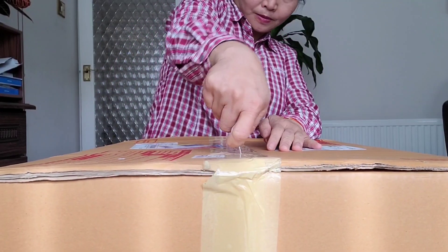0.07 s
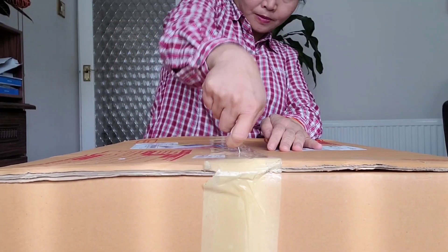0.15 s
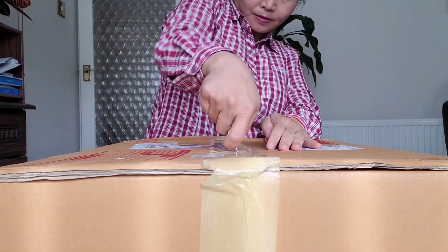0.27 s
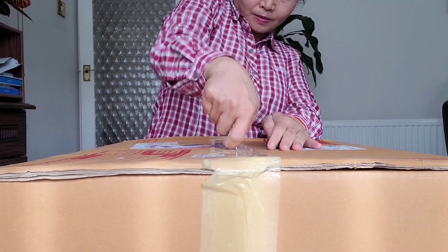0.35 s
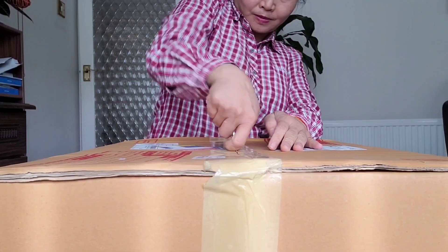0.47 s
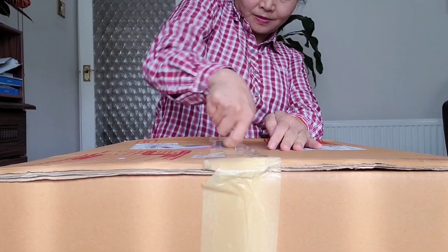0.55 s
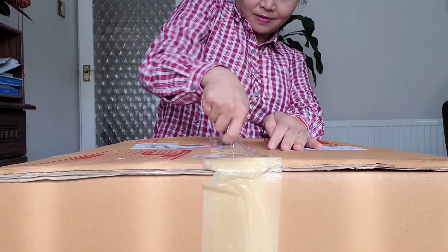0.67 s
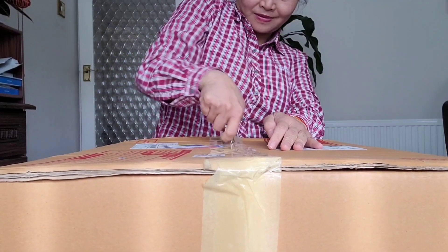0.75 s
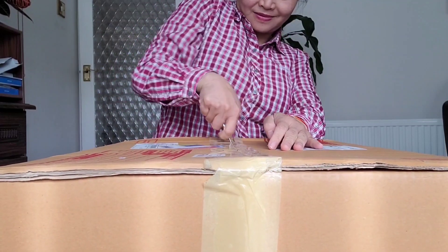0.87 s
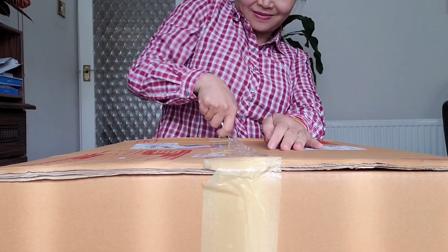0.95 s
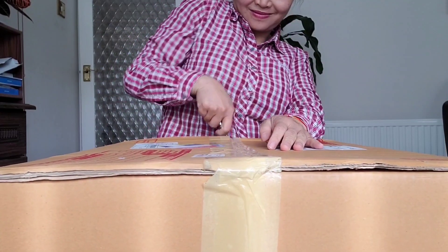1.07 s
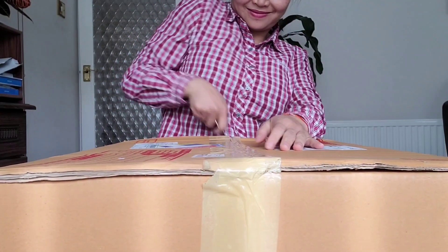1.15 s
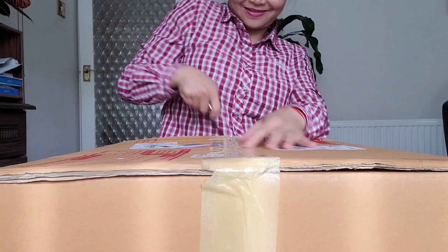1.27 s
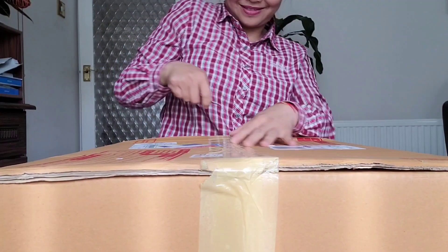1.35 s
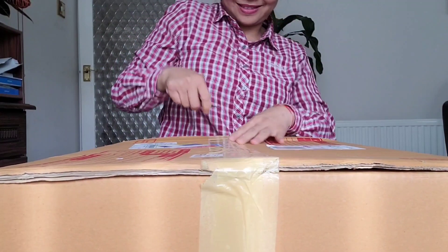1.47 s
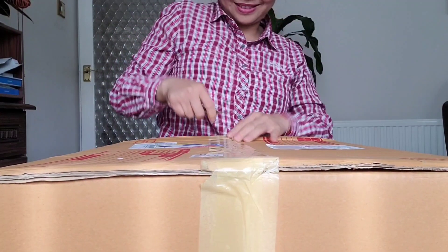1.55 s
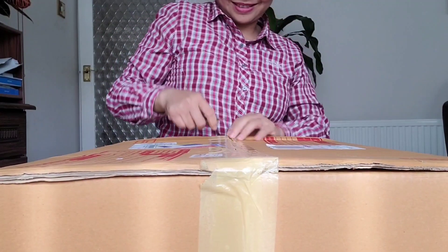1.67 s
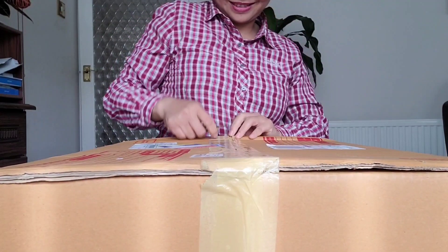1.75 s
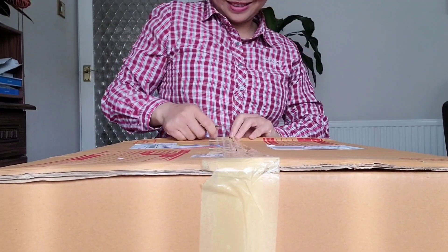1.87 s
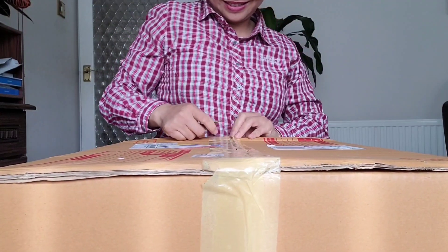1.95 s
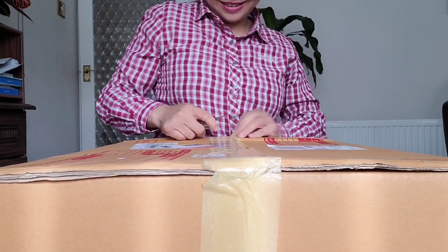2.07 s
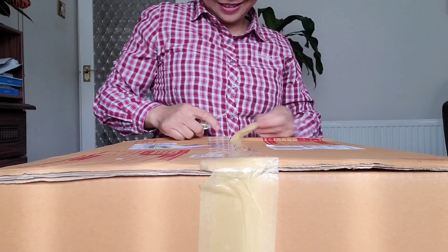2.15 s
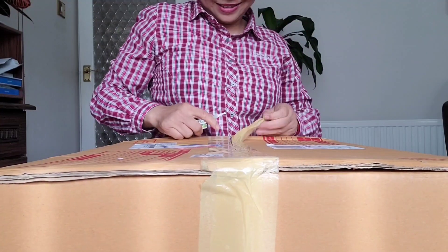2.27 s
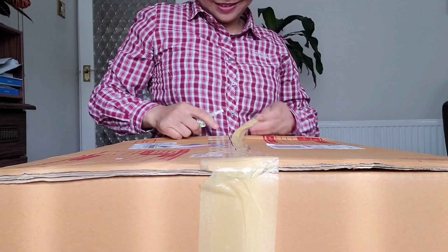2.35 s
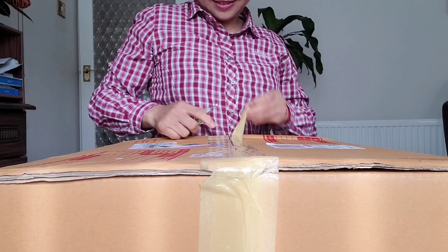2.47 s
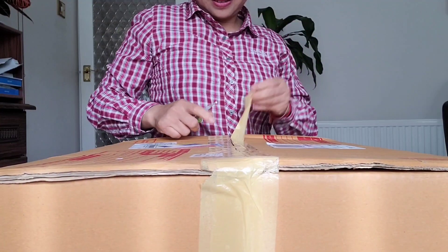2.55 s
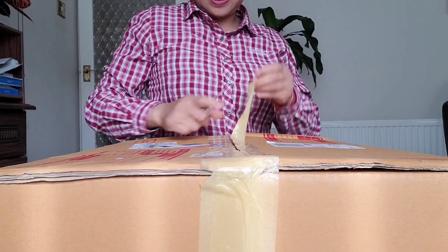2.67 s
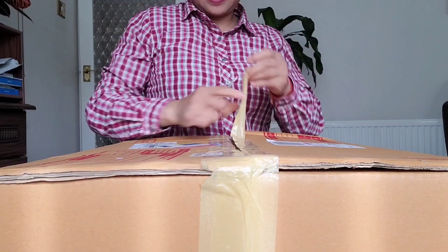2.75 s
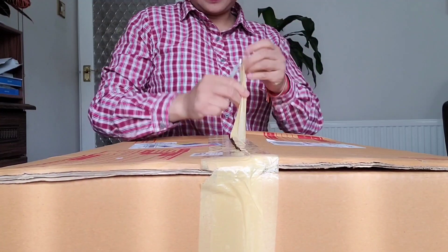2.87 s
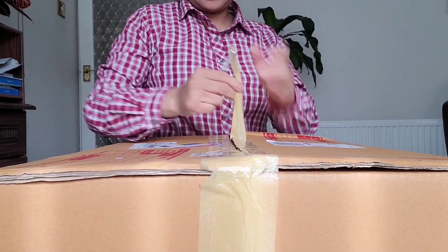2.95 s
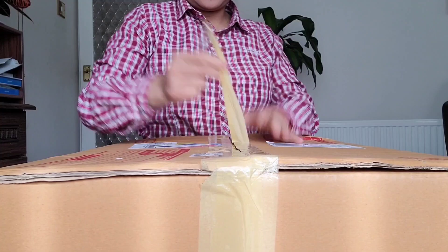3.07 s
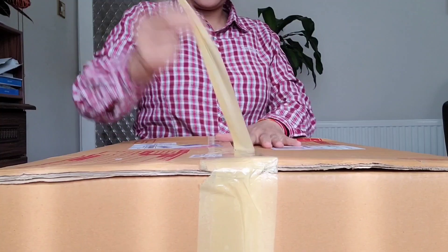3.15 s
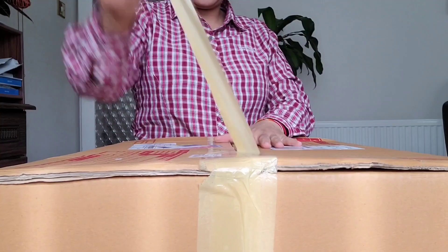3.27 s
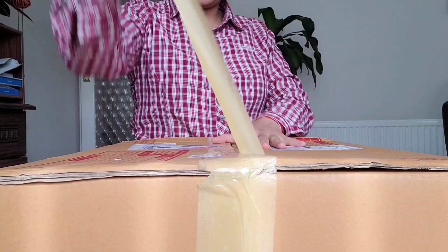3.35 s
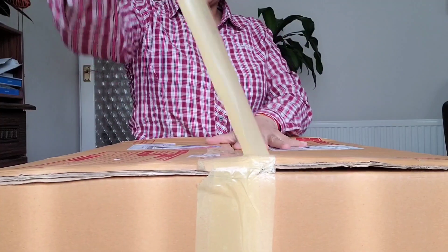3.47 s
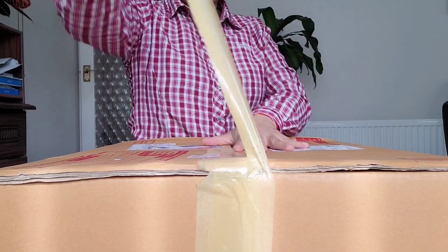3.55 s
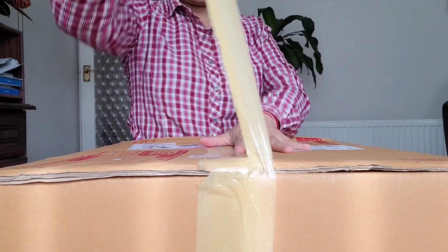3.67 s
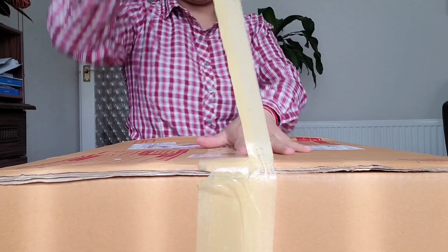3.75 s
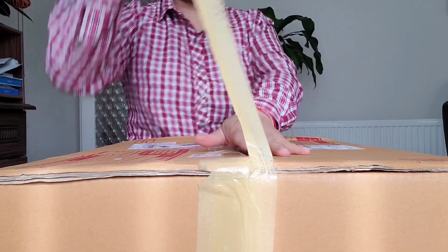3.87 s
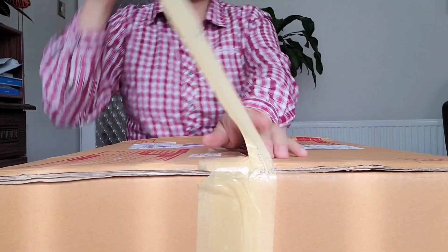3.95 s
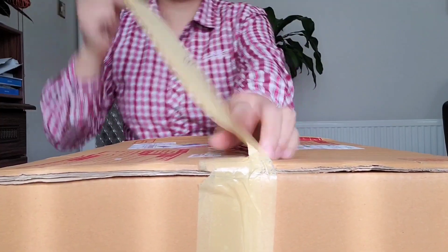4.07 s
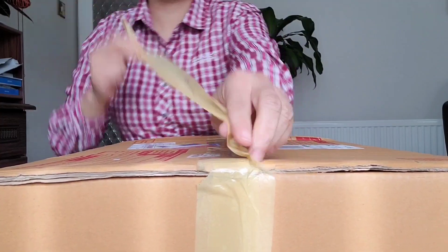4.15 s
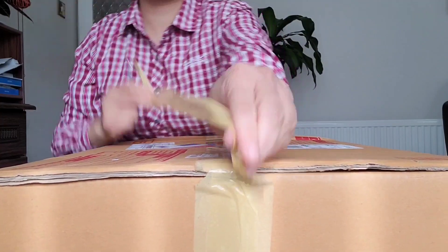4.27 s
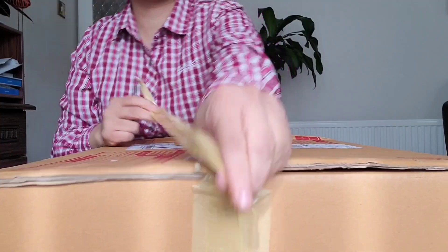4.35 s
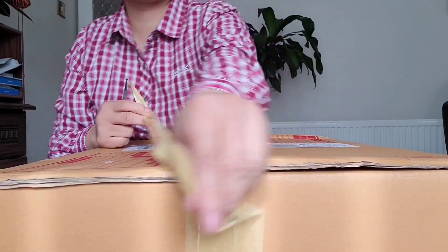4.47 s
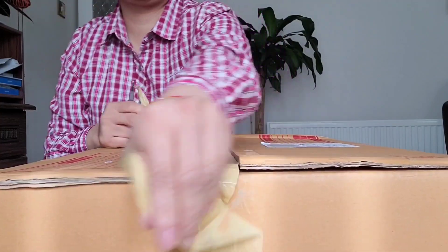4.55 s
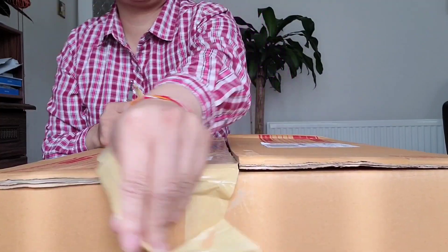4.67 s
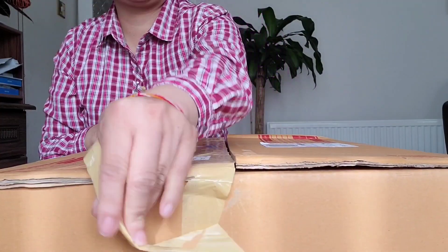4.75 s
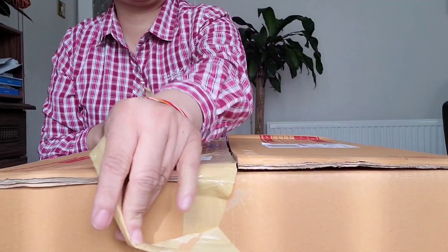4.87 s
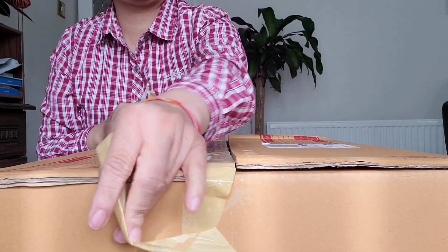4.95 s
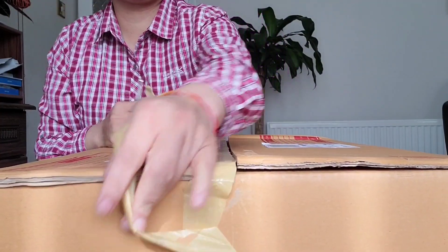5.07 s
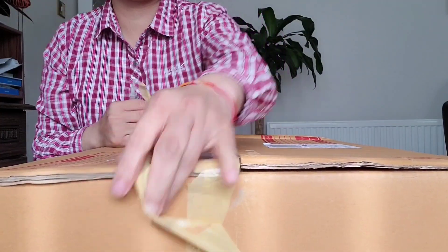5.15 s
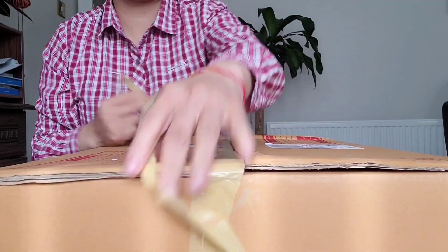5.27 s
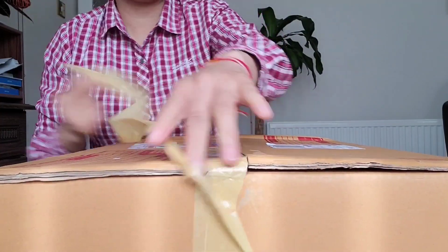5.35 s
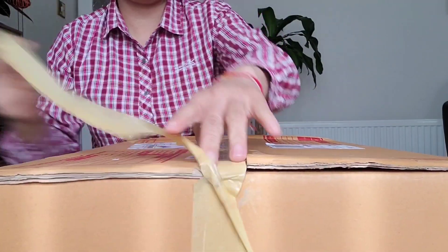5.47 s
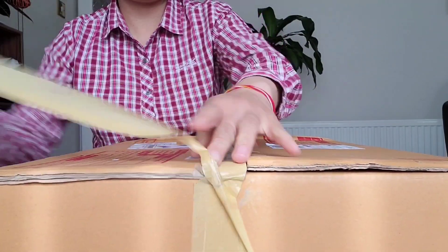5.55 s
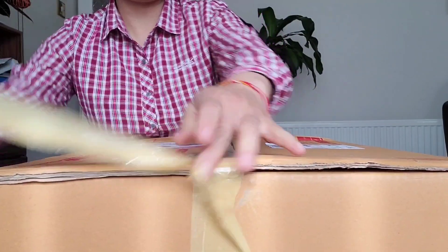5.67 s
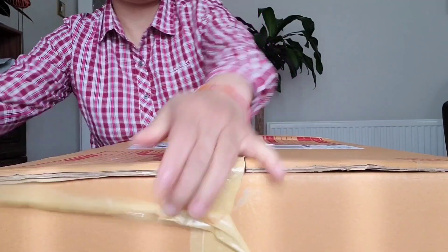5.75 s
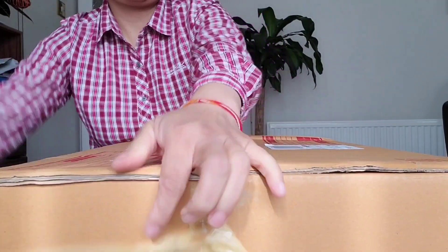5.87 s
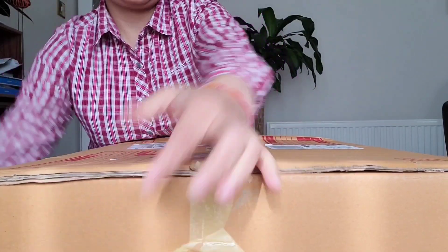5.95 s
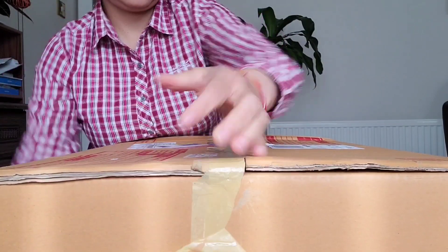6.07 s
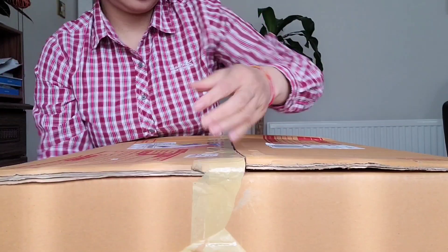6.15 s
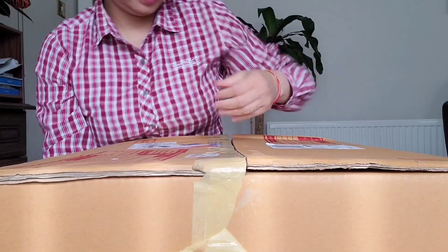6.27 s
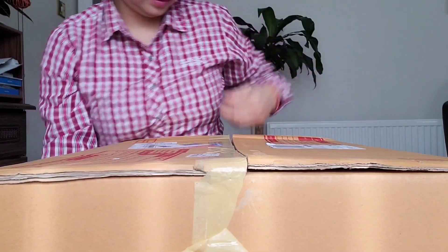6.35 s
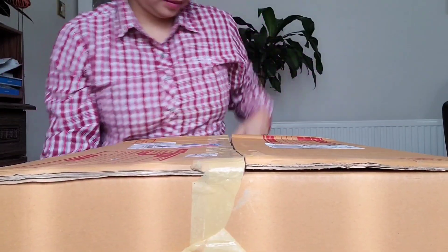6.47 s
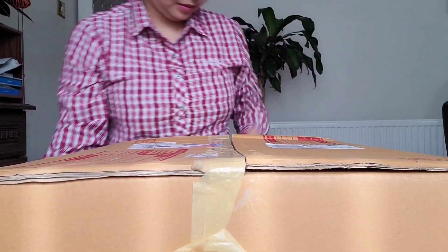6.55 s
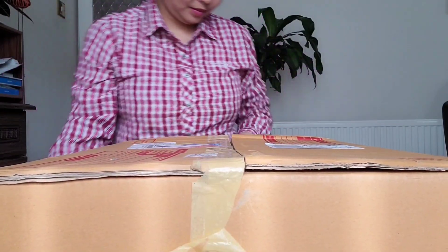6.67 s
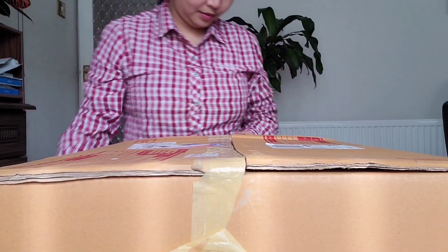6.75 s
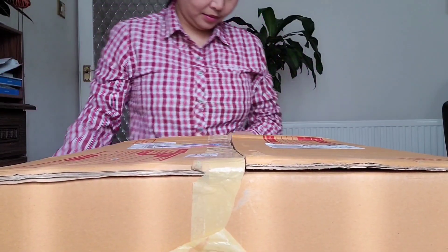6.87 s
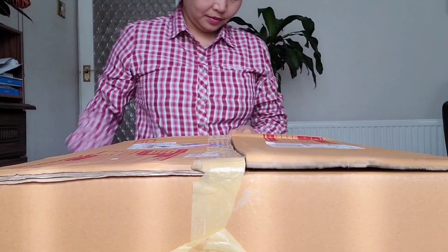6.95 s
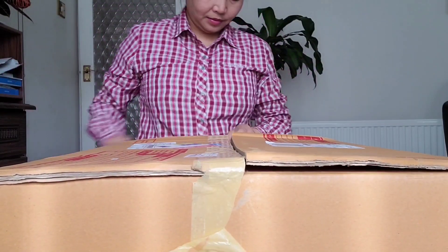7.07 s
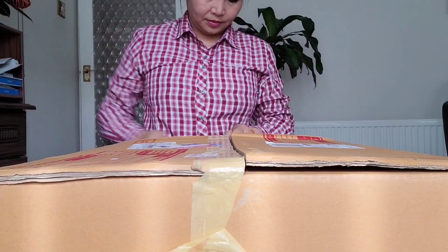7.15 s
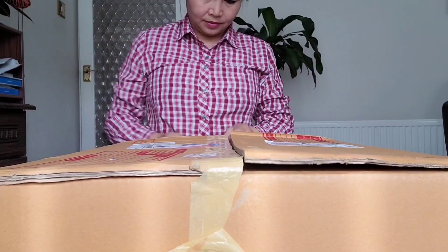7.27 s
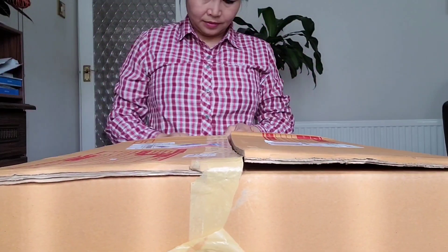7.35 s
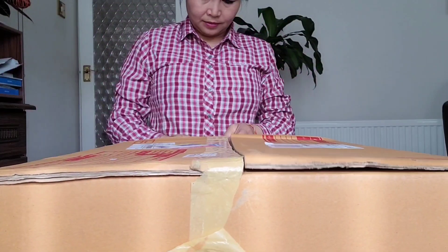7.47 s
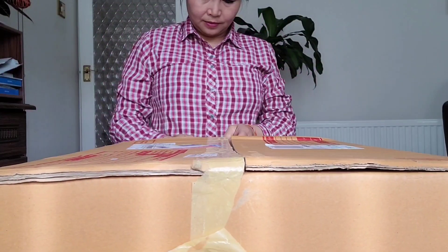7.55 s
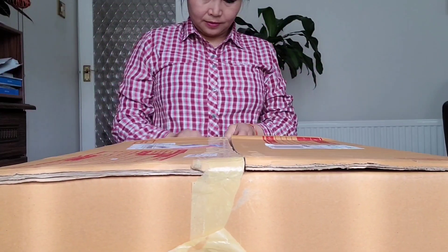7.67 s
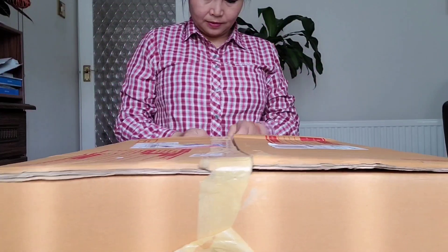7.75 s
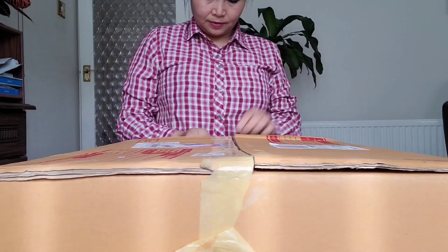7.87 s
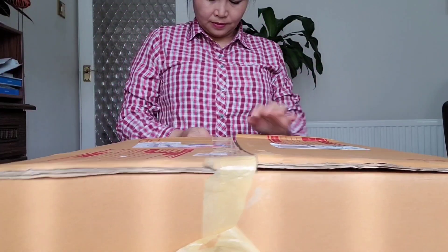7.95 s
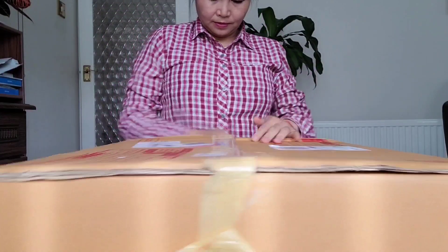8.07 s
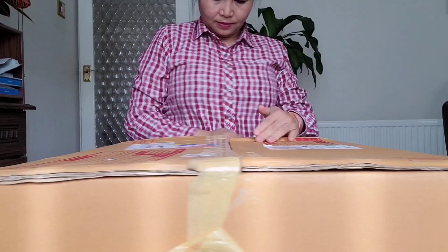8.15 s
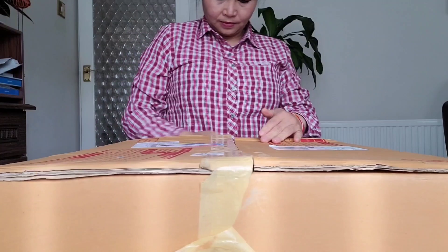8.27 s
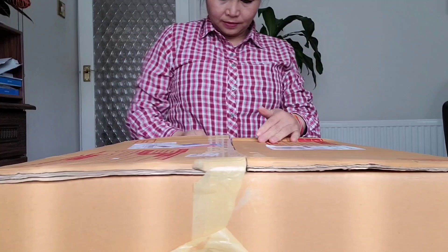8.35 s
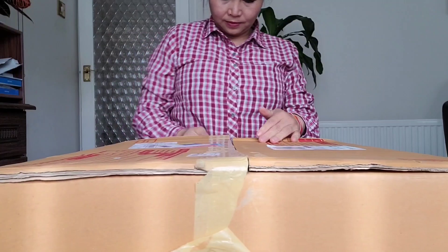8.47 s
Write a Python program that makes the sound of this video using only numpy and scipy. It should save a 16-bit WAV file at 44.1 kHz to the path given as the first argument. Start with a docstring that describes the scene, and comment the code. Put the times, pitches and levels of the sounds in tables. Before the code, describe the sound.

Blade scratches and hollow thumps on a large cardboard box, then packing tape is picked loose, ripped and peeled with bright crackles in a small room.

```python
"""Blade strokes scratch and thump on a large cardboard box; then its packing tape is picked, ripped and peeled.
Uneven stick-slip clicks make the bright glue crackle and the duller scrape of cardboard fibres.
Hand movement, knocks and shoves set low damped modes of the box drumming and booming.
Filtered clicks give single snaps, and a loose strip sings through a gliding resonance.
The working spot shifts between left and right, and sparse echoes give a small furnished room."""
import sys
import numpy as np
from scipy import signal
from scipy.io import wavfile
from scipy.ndimage import uniform_filter1d, map_coordinates

SR = 44100
rng = np.random.default_rng(int(sys.argv[2]) if len(sys.argv) > 2 else 0)


def waveform_to_disk(signal):
    """Save audio, clipped to [-1, 1], as 16-bit WAV at the path in sys.argv[1]."""
    frames = np.transpose(np.atleast_2d(signal))
    scaled = np.clip(frames, -1, 1) * 32767
    samples = np.round(scaled).astype(np.int16)
    wavfile.write(sys.argv[1], SR, samples)


N = 375291  # length [samples]

# Decay of the echoes: (frequency [Hz], time to fall by 60 dB [s])
ROOM_DECAY = [(100, 0.14), (300, 0.13), (1000, 0.12), (4000, 0.1), (13000, 0.096)]
# Likeness of the echoes at the two ears: (frequency [Hz], likeness [0-1])
EAR_LIKENESS = [(100, 0.5), (400, 0.45), (1200, 0), (4000, 0.03)]
# Where the hands work: (time [s], lead of the left ear [samples], left over right [dB])
HAND_PLACES = [(0, 10.5, 1), (1, 3, -1), (2.5, 4, 1), (3.7, 4.5, 0.5), (4.5, 5, 1), (5.3, -1, 0),
               (6.2, 2, -2), (7, 1, -2.5), (8.5, -2, -1.5)]

# Sway of the whole box: (frequency [Hz], bandwidth [Hz], relative level [dB])
SWAY_MODES = [(46.75, 4.5, 7), (65.8, 10.5, 7.5)]
# Boom of the lid: (frequency [Hz], bandwidth [Hz], relative level [dB])
LID_MODES = [(129, 10, -0.088), (139.3, 10.3, -0.91)]
# Drumming of the panels: (frequency [Hz], bandwidth [Hz], relative level [dB])
PANEL_MODES = [(239.5, 12, 4.5), (264.9, 9.5, 2), (321, 38, 5.5), (401, 79, 2.5), (484.6, 40, 0),
               (554.5, 82, 3.5), (673, 74, 0.5), (768, 71, -3), (943, 170, -4.5), (1164, 120, -7.5)]

# Hands shove the box: (time [s], sway of the whole box [dB], boom of the lid [dB])
SHOVES = [(0.0, -37.5, -42), (.07, -46, -58), (0.199, -51, -35), (0.249, -34, -33), (0.289, -39, -33),
          (0.401, -42, -25), (0.44, -34, -30.5), (0.506, -23, -28), (0.711, -34, -29.5), (0.801, -39, -33),
          (1.199, -36.5, -54), (1.92, -55, -73), (2.159, -45.5, -66), (2.641, -54, -51.5),
          (2.709, -61, -46), (3.04, -50, -36), (3.079, -55.5, -33), (3.202, -43, -22.5), (3.301, -41, -45),
          (3.341, -38.5, -26.5), (3.373, -31, -20.5), (3.62, -32, -45.5), (4.442, -41, -50),
          (4.582, -69, -49), (4.644, -69, -45), (4.724, -70, -46.5), (5.19, -46, -52.5),
          (5.362, -42.5, -59), (6.2, -60, -56), (6.667, -47, -43.5), (6.687, -41.5, -50),
          (7.045, -51.5, -59), (7.56, -56.5, -80.5), (8.07, -54, -53), (8.113, -31, -32.5),
          (8.17, -25.5, -44), (8.21, -38, -53), (8.271, -41, -55), (8.366, -54, -71)]
# Blows on the cardboard: (time [s], peak [dB], lid boom weight [dB], pitch of the struck panel [Hz])
KNOCKS = [(0.197, -26, -8, 354), (0.247, -21, -13, 400), (0.355, -21, 5, 330), (0.4, -15, -10, 264),
          (0.501, -10, -1, 317), (0.72, -20, 0, 400), (2.159, -30, -13, 480), (2.946, -31, 6, 269),
          (3.2, -18, -10, 494), (3.292, -23, -14, 238), (3.358, -21, -9, 250), (3.604, -16.5, -12, 307),
          (3.617, -22, -20, 337), (3.637, -28, -20, 340), (3.66, -22.5, -22, 314), (4.744, -31.5, -25, 320),
          (4.96, -34.5, -3.5, 257), (5.182, -23.5, -28, 258), (5.332, -24, -6.5, 330),
          (6.667, -34.5, -10, 230), (6.679, -39, -13, 260), (6.7, -39, -20, 270), (6.733, -43, -18, 280),
          (7.919, -41, -5.5, 270), (8.111, -17.5, -20, 555), (8.119, -18, -19, 230),
          (8.154, -19.5, -19, 520), (8.164, -19.5, -22, 247), (8.207, -29, -20, 250)]

# Loose tape and hands rustle underneath the strokes:
# (time [s], crackle [dB], scrape over crackle [dB], panels over crackle [dB])
RUSTLE = [(0.0, -60.5, 6, 5.5), (.66, -57.5, -5.5, 6.5), (1.33, -62, -9, -8), (1.66, -65, -2, -11.5),
          (2.12, -63, -7.5, -3.5), (2.4, -60, -8, -4), (2.47, -92, -11, -8), (2.6, -56.5, -4, -5.5),
          (2.8, -77, -12, 8.5), (2.93, -57.5, -2.5, 3), (4.15, -58.5, -10.5, -5.5), (4.9, -59.5, -14, -5.5),
          (5.05, -64, -5, -24), (5.3, -56, -8, -1.5), (5.84, -64.5, -6.5, -10), (5.89, -46, -6.5, -16),
          (6.24, -64, -27, -6), (6.5, -67, 3.5, -2), (6.95, -68.5, -5.5, -5.5), (7.08, -71.5, -11, 3.5),
          (7.2, -80, 8, 7), (7.47, -75, 6.5, -15), (7.74, -85, -6, -4), (8.04, -78.5, 2, 3),
          (8.51, -100, -8.5, -7)]
# Hand rubs, each a stroke: (start [s], length [s], crackle at full rise, without the swell [dB],
# swell over the stroke [dB], scrape over crackle [dB], panels over crackle [dB])
RUBS = [(1.44, 0.13, -47.5, -15, -3.5, -4), (1.9, 0.024, -69, -15, 2, -2),
        (2.04, 0.025, -54.5, -11, -13, 6), (6.66, 0.041, -74, -9, -6, 25.5), (6.76, 0.023, -55, -5, 0, 17),
        (7.54, 0.02, -44, -5, -1.5, -19), (7.77, 0.075, -53.5, -6.5, 4, 2.5),
        (7.88, 0.051, -64.5, -2, 9.5, 9), (8.07, 0.036, -43, -4, -12, -4.5)]
# Blade cuts, each a stroke: (start [s], length [s], crackle at full rise, without the swell [dB],
# swell over the stroke [dB], scrape over crackle [dB], panels over crackle [dB])
CUTS = [(0.0, 0.028, -36, -10, 3, 16.5), (.18, 0.2, -53, -18, 15, 16), (.33, 0.13, -45, -7, 4.5, 17),
        (.49, 0.031, -34.5, -7, 6.5, 8), (.68, 0.35, -49, -1.5, 4.5, 15), (.96, 0.22, -46.5, -1.5, 4, 12.5)]
# Tape peels, each a stroke: (start [s], length [s], crackle at full rise, without the swell [dB],
# swell over the stroke [dB], scrape over crackle [dB], panels over crackle [dB])
PEELS = [(2.158, 0.078, -41, -3.5, -1, -5.5), (2.363, 0.0067, -50.5, -10, -17, -21),
         (2.517, 0.043, -47.5, -3, -8.5, -17), (2.7, 0.015, -46, -6, -4.5, -3),
         (2.83, 0.14, -52, -10, -9.5, -6), (4.17, 0.39, -54.5, 0, -4.5, -1), (4.5, 0.23, -45, -2.5, -3, -2),
         (4.74, 0.094, -47.5, -4.5, -8, -6.5), (5.185, 0.024, -48, -0.5, -6, -22),
         (5.33, 0.011, -44, 0.5, -4.5, -6), (5.66, 0.039, -54, -0.5, -4, -18),
         (5.893, 0.34, -44.5, -13, -11, -23), (6.29, 0.066, -53, 7.5, -10, -7.5),
         (8.111, 0.053, -44, 3, 2.5, 4)]
# The long rip along the lid: (time [s], crackle [dB], scrape over crackle [dB],
# panels over crackle [dB], lid over panels [dB])
RIP = [(2.9, -83.5, 7.5, -7, -16), (2.97, -49, 11, 5.5, -6), (3.04, -55, -9, 8.5, 9),
       (3.13, -42, -1, 2.5, 9.5), (3.24, -34.5, -6, -4.5, 8.5), (3.42, -38, -4, 2.5, 3),
       (3.55, -38.5, -7.5, 1.5, 3.5), (3.645, -34, -6, -5, -10), (3.69, -53, 2, -7.5, -6),
       (3.79, -55, -13, -7, 2), (3.88, -51, -4.5, 3, -19), (4.1, -59, -5, -10, -17),
       (4.2, -92, -9.5, -3.5, -16)]

# Jerks of blade, tape or hand along the cardboard: (time [s], level before shaping [dB],
# dull part over bright part [dB], length [ms])
JERKS = [(0.1837, -38, 4, 18), (0.242, -44, 5, 50), (0.3522, -36, 7, 11), (0.401, -28.5, 1, 7.3),
         (0.4983, -30.5, 2.5, 14.2), (0.726, -40, 4, 48), (0.987, -36, 2, 32), (1.168, -37, 2, 11.4),
         (2.962, -37.5, 2.5, 12), (3.596, -23.5, -8, 13), (4.359, -24, -14, 6), (4.515, -36.5, -6.5, 24),
         (4.626, -35, -19.5, 24), (6.35, -37.5, -7.5, 31), (6.657, -52.5, 10, 17), (6.763, -50, 9, 57),
         (7.913, -48, 5.5, 36)]
# Glue letting go at once: (time [s], level of the first 2 ms before panning [dB],
# dull part over bright part [dB], left over right [dB])
SNAPS = [(1.937, -39.5, -11, 3), (2.1585, -31, -3.5, 3), (2.3303, -43, -7, -10), (2.363, -33.5, -8.5, 5),
         (2.4788, -46, -11, 1), (2.518, -33.5, -38, 8), (2.5382, -38, -9, -15), (2.7138, -38, -6, 13.5),
         (2.8315, -32.5, -11, 11), (2.9189, -48.5, -6.5, 28), (3.1573, -37, -4, 25), (3.2957, -44, -8, 4),
         (3.6403, -29, -6.5, 22.5), (4.1768, -39, -11, 0), (4.208, -39, -11.5, 5), (4.248, -34, -9, -3),
         (4.256, -27.5, -29, 8.5), (4.273, -30, -27, 0), (4.314, -38, -14, 11), (4.3376, -35.5, -13, 8),
         (4.357, -31, -20, -14), (4.414, -39, -27, 0), (4.441, -43, -20, 2), (4.62, -29, -42, 5),
         (4.677, -30.5, -16, 7), (4.7096, -33.5, -6, 5), (4.7451, -29, -3, 3.5), (4.9641, -27.5, -5.5, 1),
         (5.1827, -22.5, -6.5, -4), (5.3324, -28, -7, -13), (5.5337, -43.5, -23, 15),
         (5.6396, -39.5, -12.5, -6), (5.689, -41.5, -25, 16), (5.699, -42.5, -7, 8), (5.7934, -44, -9, 8),
         (5.9, -31.5, -15, -19), (6.0311, -36.5, -13, -13), (6.3068, -48.5, -23, -28), (7.6256, -51, -8, 0),
         (7.819, -47, 0, 4), (8.076, -41, -16, 2), (8.114, -26, -4, 5), (8.1494, -22, -5.5, 5.5)]
# A free strip of tape or flap sings at a pitch set by its length: (time [s], pitch [Hz], level [dB])
STRIP = [(3.38, 2610, -84), (3.45, 2290, -43), (3.58, 1690, -43.5), (3.66, 1626, -101), (6.06, 837, -100),
         (6.12, 950, -57), (6.17, 1100, -55.5), (6.25, 1306, -110)]
# Spectrum of torn cardboard fibres: (frequency [Hz], relative level per Hz [dB])
SCRAPE_COLOUR = [(450, -5.5), (900, -4), (1400, -2.5), (2400, -2.5), (3600, -5), (7000, -7), (15000, -73)]
# Spectrum of parting glue: (frequency [Hz], relative level per Hz [dB])
CRACKLE_COLOUR = [(1470, -18.5), (2500, -6.5), (2970, -8.5), (3130, -7.5), (4210, -5), (12100, -6.5),
                  (15200, -9), (16000, -19)]

# Manner of a stroke: (rise [s], fall [dB/s], lid over panels [dB], sway over panels [dB])
BLADE = (0.22, 238, -3.5, -12.5)
GLUE = (0.0251, 198, -4, -7.5)
PALM = (0.06, 227.5, -11.5, -12)

HUSH_DB = -99
EDGE_HZ = 16000  # upper band limit
CONTACT_CYCLES = 0.19  # a blow lasts this share of the panel's period
SHOVE_S, SWING_S = 0.0052, 0.032  # length of the push; the first swings, whose level the table gives
SHUDDER_DB, SHUDDER_FALL_DB_PER_S = -25, 175  # panels rattle on: level over the blow, and its fall
SCATTER_DB = 27.5  # threads part all over the tape, many of them far to the left or right


def gain_of(db):
    """Amplitude gain of a level in decibels."""
    return 10 ** (np.asarray(db) / 20)


def evened(x):
    """Scales a signal to rms 1."""
    return x / np.sqrt(np.mean(x ** 2) + 1e-20)


def read(points, hz):
    """Reads a frequency curve, joined by straight lines on a log frequency axis."""
    f, value = np.transpose(points)
    return np.interp(np.log(hz + 1), np.log(f + 1), value)


def column(table, index):
    """One control of a table, joined by straight lines over time."""
    rows = np.array(table)
    return np.interp(np.arange(N) / SR, rows[:, 0], rows[:, index])


def through(x, taps):
    """Passes a signal through an impulse response."""
    return signal.oaconvolve(x, taps)[:N]


def colour(points):
    """Causal (minimum-phase) impulse response of a spectrum, energy 1."""
    hz = abs(np.fft.fftfreq(4096, 1 / SR))
    log_gain = np.log(gain_of(np.maximum(read(points, hz), -100)))
    phase = -signal.hilbert(log_gain).imag
    taps = np.fft.ifft(np.exp(log_gain + 1j * phase)).real[:1024]
    return taps / np.linalg.norm(taps)


def tilted(dull_db):
    """Colour of one event: the more of the cardboard's middle range it has, the more its top droops."""
    middle = [(350, dull_db - 4.5), (900, dull_db + 5.5), (2200, dull_db + 4.5)]
    top = [(4200, 0.0064), (15500, -7.0 - 0.48 * dull_db)]
    return colour(middle + top)


def ring(modes):
    """Impulse response of damped modes, energy 1; a wider mode dies sooner."""
    t = np.arange(SR // 4) / SR
    taps = sum(gain_of(db) * np.sqrt(width) * np.exp(-np.pi * width * t) * np.sin(2 * np.pi * hz * t)
               for hz, width, db in modes)
    return taps / np.linalg.norm(taps)


def slips(per_s, spread_db, clump_db, clump_s):
    """Stick-slip force: clicks of very uneven size that come in clumps, rms 1."""
    size = gain_of(spread_db * np.minimum(rng.exponential(1, N), 4)) * rng.choice([-1., 1.], N)
    happens = rng.random(N) < per_s / SR
    clumps = evened(uniform_filter1d(rng.standard_normal(N), max(round(clump_s * SR), 2)))
    return evened(size * happens * gain_of(clump_db * np.clip(clumps, -2, 2)))


def wander(spread_db, pace_s):
    """The working spot moves about, so a mode is fed now more, now less; rms 1."""
    step = 100  # samples between drift points
    drift = rng.standard_normal(N // step + 2)
    drift = evened(uniform_filter1d(drift, max(round(pace_s * SR / step), 2)))
    smooth = np.interp(np.arange(N) / step, np.arange(len(drift)), drift)
    return evened(gain_of(spread_db * smooth))


def hush():
    """Very faint white noise, independent at each ear."""
    return gain_of(HUSH_DB) * rng.standard_normal((2, N))


def echoes(start_s):
    """Sparse taps of random sign, each band dying at its own speed; long waves reach both ears more alike."""
    size = SR // 2
    taps = np.zeros((2, size))
    at = np.arange(round(start_s * SR), size - 20, 20)
    at = at + rng.integers(0, 20, (2, len(at)))
    np.put_along_axis(taps, at, rng.choice([-1., 1.], at.shape), 1)
    hz, t, (a, b) = signal.stft(taps, SR, nperseg=512)
    alike = np.clip(read(EAR_LIKENESS, hz), 0, 1)[:, None]
    bands = np.array([a, alike * a + np.sqrt(1 - alike ** 2) * b])
    decay = gain_of(-60 * t / read(ROOM_DECAY, hz)[:, None])
    tail = signal.istft(bands * decay, SR, nperseg=512)[1]
    return tail / np.linalg.norm(tail[0])


def room(x, turns_per_s):
    """The sound fades steadily around three sets of echoes, so the room tail stays diffuse and noisy."""
    turn = 2 * np.pi * turns_per_s * np.arange(N) / SR
    out = np.zeros((2, N))
    for k in range(3):
        share = np.sqrt(2 / 3) * np.cos(turn + 2 * np.pi * k / 3)
        out += signal.fftconvolve((x * share)[None], echoes(0.0023), axes=1)[:, :N]
    return out


def ears(x):
    """A moving source reaches the ears with a shifting time lead and level difference."""
    n = np.arange(N)
    half_lead = column(HAND_PLACES, index=1) / 2
    half_pan_db = column(HAND_PLACES, index=2) / 2
    return np.array([gain_of(side * half_pan_db) * map_coordinates(ear, [n + side * half_lead], order=3)
                     for side, ear in zip((1, -1), x)])


def shoves():
    """One soft push sets the whole box swaying and the lid booming; both ring out freely."""
    out = np.zeros(N + SR)
    push = signal.windows.hann(round(SHOVE_S * SR))
    first_swings = round(SWING_S * SR)
    sway = np.convolve(push, ring(SWAY_MODES))
    sway /= np.sqrt(np.mean(sway[:first_swings] ** 2))
    boom = np.convolve(push, ring(LID_MODES))
    boom /= np.sqrt(np.mean(boom[:first_swings] ** 2))
    for s, sway_db, lid_db in SHOVES:
        out[round(s * SR):][:len(sway)] += gain_of(sway_db) * sway + gain_of(lid_db) * boom
    return out[:N]


def knocks():
    """A blow rings mostly the modes near the pitch of the panel that it strikes, and the lid."""
    lid = ring(LID_MODES) + 0.36 * ring(SWAY_MODES)
    out = np.zeros(N + SR)
    for s, db, boom_db, panel_hz in KNOCKS:
        # modes lose 21 dB per octave away from the struck pitch
        panel = ring([(hz, width, level - 21 * abs(np.log2(hz / panel_hz)))
                      for hz, width, level in PANEL_MODES])
        contact = signal.windows.hann(round(CONTACT_CYCLES * SR / panel_hz))
        blow = np.convolve(contact, panel + gain_of(boom_db) * lid)
        at = round(s * SR)
        out[at:at + len(blow)] += gain_of(db) * blow / abs(blow).max()
    return out[:N]


def drumming(panels, lid, rock):
    """Hands, blade and tape shake the box; each group of modes rings on after the force stops."""
    clump_db = 1.5
    sway = through(rock * slips(300, 1.1, clump_db, 0.035), ring(SWAY_MODES))
    boom = through(lid * slips(300, 2.4, clump_db, 0.048), ring(LID_MODES))
    force = panels * slips(1500, 3.0, clump_db, 0.022)
    energy = gain_of(np.array(PANEL_MODES)[:, 2]) ** 2
    drum = sum(np.sqrt(share) * through(force * wander(3.0, 0.072), ring([mode]))
               for mode, share in zip(PANEL_MODES, energy / energy.sum()))
    return sway + boom + drum


def add(power, start, length, db, swell_db, rise, fall_db_per_s):
    """Lays one effort on a power line: a rise, a swell over its length, a steady fall."""
    part = power[round(start * SR):][:round((length + .45) * SR)]
    t = np.arange(len(part)) / SR
    shape_db = swell_db * np.minimum(t / length, 1) - fall_db_per_s * np.maximum(t - length, 0)
    part += (np.minimum(t / rise, 1) * gain_of(db + shape_db)) ** 2


def held(curve, lid_db):
    """Power of the five efforts under one lasting action."""
    db = column(curve, index=1)
    scrape_db = db + column(curve, index=2)
    box_db = db + column(curve, index=3)
    return gain_of([db, scrape_db, box_db, box_db + lid_db, box_db + GLUE[3]]) ** 2


def efforts():
    """Gain over time of crackle, scrape, panels, lid and sway, summed as power over all the actions."""
    power = np.zeros((5, N))
    for rows, (rise, fall, lid_db, sway_db) in ((CUTS, BLADE), (PEELS, GLUE), (RUBS, PALM)):
        for s, length, db, swell_db, scrape_db, box_db in rows:
            over_crackle_db = (0, scrape_db, box_db, box_db + lid_db, box_db + sway_db)
            for line, over_db in zip(power, over_crackle_db):
                add(line, s, length, db + over_db, swell_db, rise, fall)
    panels = power[2]
    for s, db, _, _ in KNOCKS:
        add(panels, s, .01, db + SHUDDER_DB, 0, .003, SHUDDER_FALL_DB_PER_S)
    return np.sqrt(power + held(RIP, column(RIP, index=4)) + held(RUSTLE, PALM[2]))


def jerks():
    """A run of slips that starts at once and dies as the movement stops."""
    force = slips(6000, 2.5, 1.5, .006)
    out = np.zeros(N + SR)
    t = np.arange(SR // 5) / SR
    for s, db, dull_db, ms in JERKS:
        at = round(s * SR)
        shape = (1 - np.exp(-t / 0.0027)) * np.exp(-(1000 * t / ms) ** 2)
        burst = np.convolve(shape * force[at:at + len(t)], tilted(dull_db))
        out[at:at + len(burst)] += gain_of(db) * burst
    return out[:N]


def snaps():
    """One sharp click, then a few milliseconds of the film rattling."""
    out = np.zeros((2, N + 4000))
    t = np.arange(1000) / SR
    for s, db, dull_db, pan_db in SNAPS:
        force = .12 * rng.standard_normal(1000) * np.exp(-t / .0028)
        force[0] = 1
        click = np.convolve(force, tilted(dull_db))
        click /= np.sqrt(np.mean(click[:SR // 500] ** 2))  # first 2 ms at rms 1
        at = round(s * SR)
        ear_db = db + np.array([[pan_db], [-pan_db]]) / 2
        out[:, at:at + len(click)] += gain_of(ear_db) * click
    return out[:, :N]


def strip(width_hz=600):
    """Slips pass a resonance that moves: shifted down to zero, smoothed twice, shifted back."""
    turn = np.exp(2j * np.pi * np.cumsum(column(STRIP, index=1)) / SR)
    r = np.exp(-np.pi * width_hz / SR)
    slow = slips(4000, 2.3, 3.7, 0.027) / turn
    for _ in range(2):
        slow = signal.lfilter([1 - r], [1, -r], slow)
    return gain_of(column(STRIP, index=2)) * evened((turn * slow).real)


def tape(crackle, scrape):
    """Glue threads part in a dense bright crackle; cardboard fibres tear with a duller one."""
    clump_db = 2.8
    force = slips(6000, 2.8, clump_db, 0.0078)
    # each slip has its own left-right balance, at constant total power
    side = gain_of(SCATTER_DB * np.clip(rng.standard_normal(N), -2, 2))
    pair = np.sqrt(2 / (1 + side ** 2)) * [side, np.ones(N)]
    glue = np.array([through(crackle * force * ear, colour(CRACKLE_COLOUR)) for ear in pair])
    tearing = 0.35 * force + slips(2500, 2.33, clump_db, .015)
    fibres = through(scrape * tearing, colour(SCRAPE_COLOUR))
    return glue + fibres + strip()


def scene():
    """Box and tape reach the ears directly and through the room."""
    glue, scrape, panels, lid, sway = efforts()
    box = drumming(panels, lid, sway) + knocks() + shoves()
    crackle = tape(glue, scrape) + jerks()
    cracks = snaps()
    far = gain_of(-7.5) * box + gain_of(1.55) * crackle.mean(0) + gain_of(-5.5) * cracks.mean(0)
    return ears(box + crackle + cracks) + room(far, turns_per_s=9.5) + hush()


def record(dry):
    """The microphone drops the lowest bass; then the band limit takes off the extreme top."""
    cut = signal.sosfilt(signal.butter(4, 45, "highpass", fs=SR, output="sos"), dry)
    band = signal.firwin(511, EDGE_HZ, window=("kaiser", 9), fs=SR)
    return signal.oaconvolve(cut, band[None], "same")


dry = scene()
out = record(dry)
waveform_to_disk(out)
```